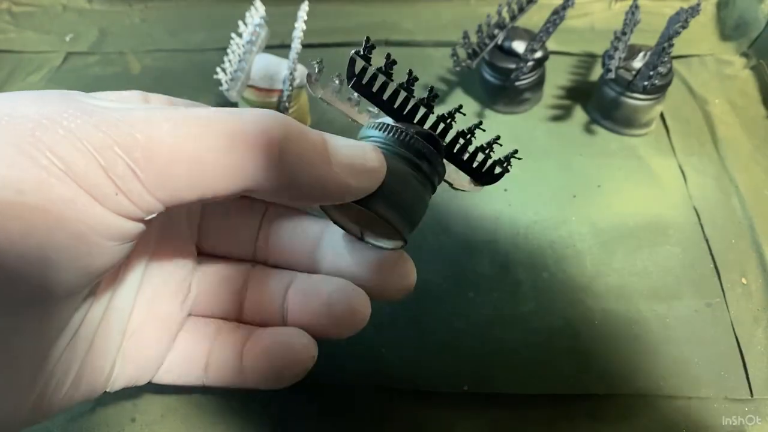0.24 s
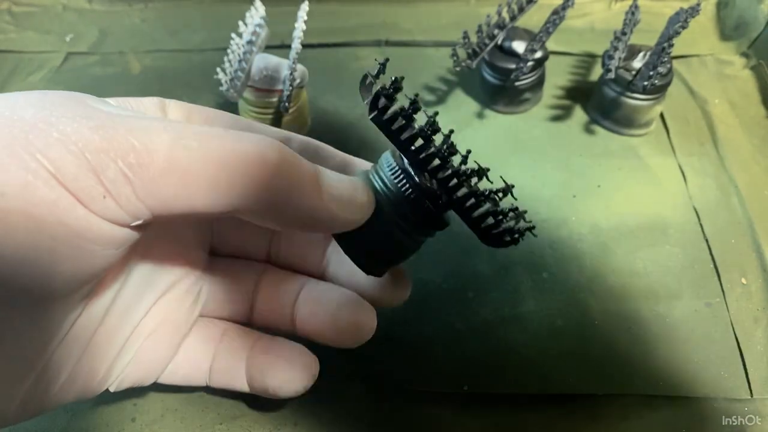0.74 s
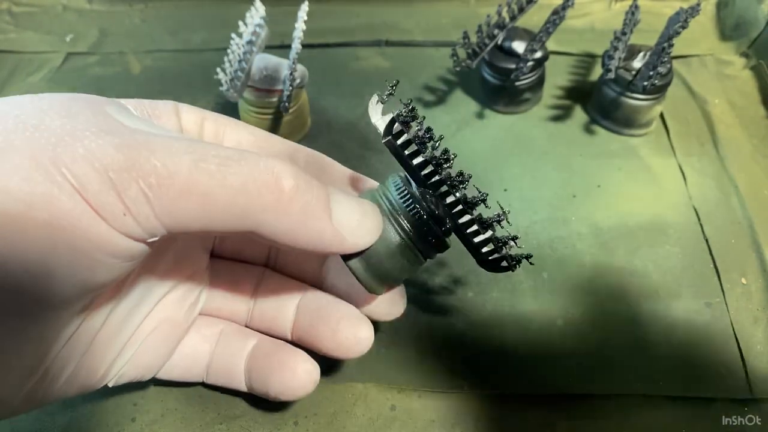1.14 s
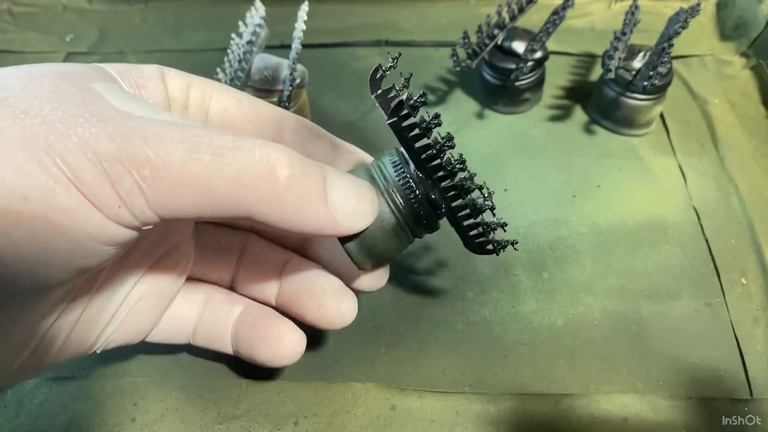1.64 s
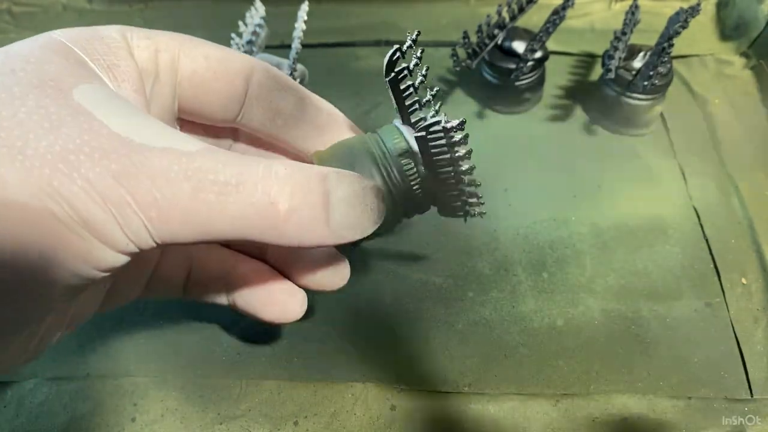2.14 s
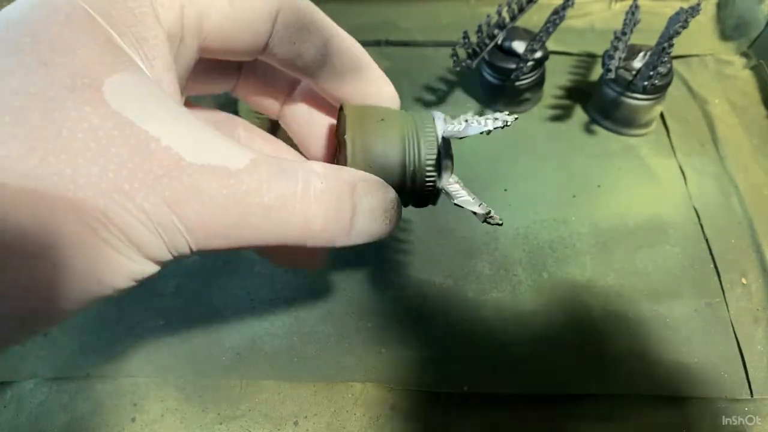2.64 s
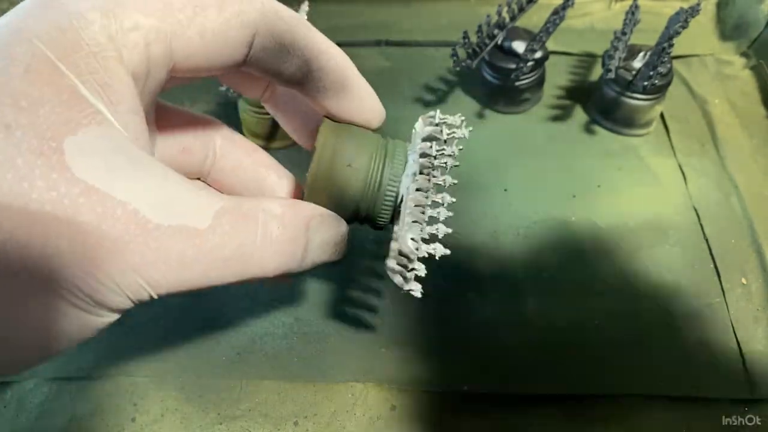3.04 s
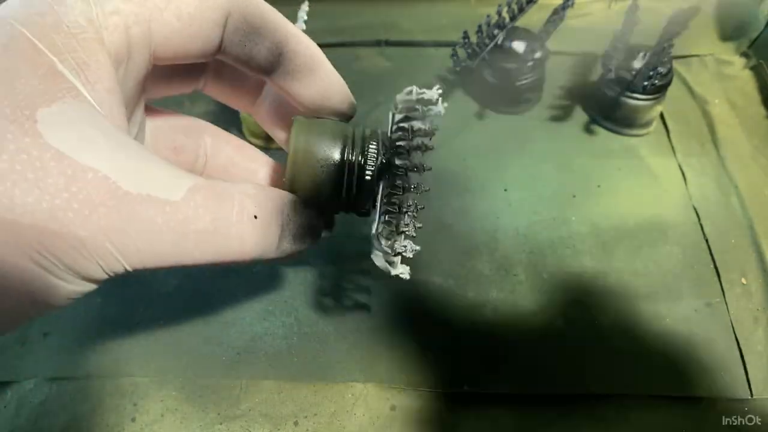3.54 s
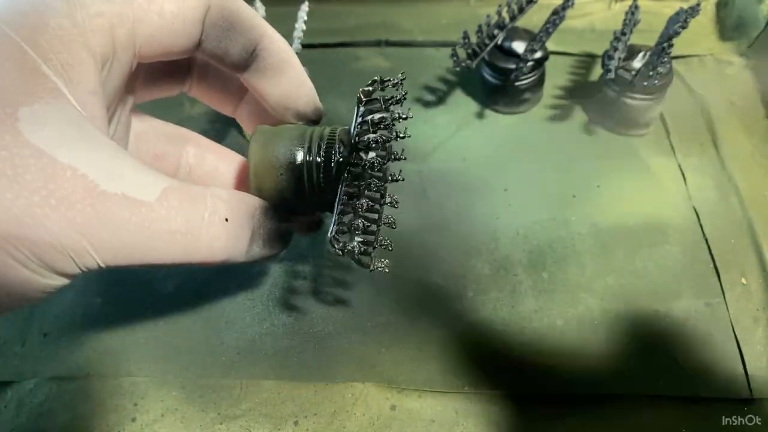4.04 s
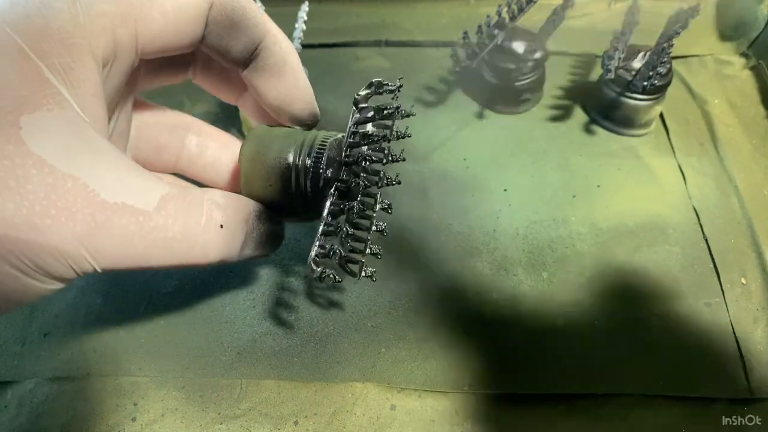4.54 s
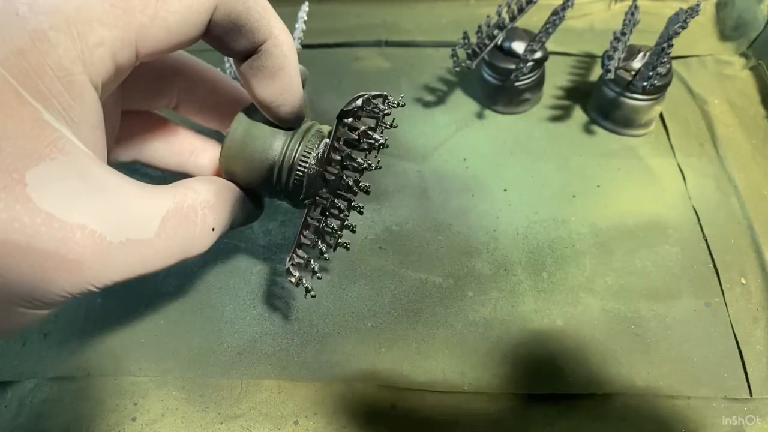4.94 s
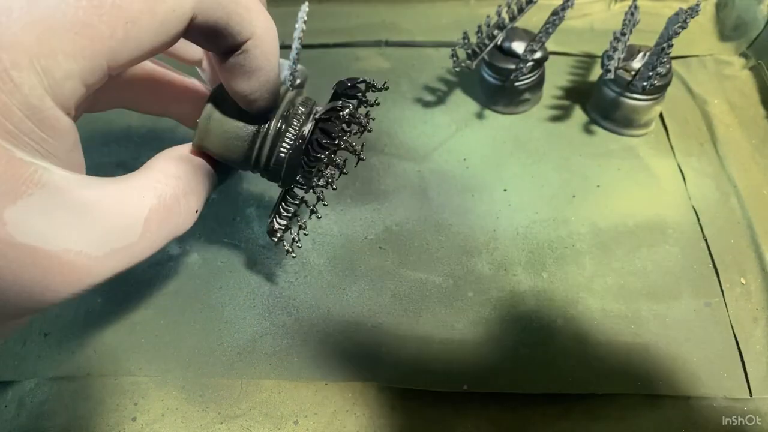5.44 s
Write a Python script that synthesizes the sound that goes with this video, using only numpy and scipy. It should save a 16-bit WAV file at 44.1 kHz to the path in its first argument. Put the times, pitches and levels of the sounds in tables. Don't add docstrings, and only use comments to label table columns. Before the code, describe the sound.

Close stereo phone pickup in a small quiet room. A spray paint can spits brief bright hisses while its mixing ball strikes the steel wall with hard metallic clacks and light bounces, paint sloshing inside. Around two seconds the ball rattles loosely, then after a short pause and another cluster of knocks near three seconds, puffs settle into an even run of about four per second, with a low room rumble beneath.

```python
import sys
import numpy as np
from scipy import signal
from scipy.fft import rfft, irfft, next_fast_len
from scipy.io import wavfile
from scipy.ndimage import uniform_filter1d, map_coordinates

SR = 44100
rng = np.random.default_rng(int(sys.argv[2]) if len(sys.argv) > 2 else 0)


def invert_db(level):
    return 10 ** (np.asarray(level, dtype=float) / 20)


def inscribe(sig):
    pcm = np.round(np.clip(np.atleast_2d(sig).T, -1, 1) * 32767)
    wavfile.write(sys.argv[1], SR, pcm.astype(np.int16))


N = 251537
FULL_DB = -24


def unit(x):
    return x / np.sqrt(np.mean(x ** 2) + 1e-20)


def along(points, hz):
    point_hz, value = np.transpose(points)
    return np.interp(np.log(hz + 1), np.log(point_hz + 1), value)


def curves(rows):
    s, *columns = np.transpose(rows)
    time_s = np.arange(N) / SR
    return np.array([np.interp(time_s, s, column, -200, -200) for column in columns])


def wobble(knots_per_s):
    knots = rng.standard_normal(int(N * knots_per_s / SR) + 4)
    return map_coordinates(knots, [np.arange(N) * knots_per_s / SR])


def filtered(x, response):
    m = next_fast_len(N + SR // 2)
    return irfft(rfft(x, m) * response(np.fft.rfftfreq(m, 1 / SR)), m)[..., :N]


def noise(spectrum, flutter=1):
    white = flutter * rng.standard_normal((2, N))
    return unit(filtered(white, lambda hz: invert_db(along(spectrum, hz))))


def resonances(modes):
    def response(f):
        total = 0
        for k, (hz, width_hz, db) in enumerate(modes):
            damping = 1j * f * width_hz
            total = total + (-1) ** k * invert_db(db) * damping / (hz * hz - f * f + damping)
        return total
    return response


def spray():
    # finger lands in s, valve fully open in s, finger lifts in s, strength in dB, sag while held in dB
    puffs = [(.001, .05, 0.11, -22.5, -3), (.252, 0.287, 0.38, -23.5, -6), (0.534, 0.591, 0.64, -22.5, -4),
             (.835, .885, .93, -30, -1.5), (1.099, 1.135, 1.177, -42, 7), (1.388, 1.418, 1.531, -23, -5.5),
             (2.095, 2.138, 2.2155, -21.5, -6), (2.485, 2.503, 2.575, -43, -7),
             (2.907, 2.946, 3.03, -36, -1.5), (3.195, 3.25, 3.303, -25.5, 1.4),
             (3.475, 3.512, 3.586, -21.5, -7.5), (3.741, 3.784, 3.862, -22.5, -7.5),
             (3.987, 4.037, 4.088, -24.5, -4), (4.233, 4.288, 4.336, -24.5, -4),
             (4.504, 4.547, 4.61, -24.5, -3), (4.733, 4.777, 4.826, -24.5, 1.2),
             (5.007, 5.053, 5.135, -21.5, -8.5), (5.257, 5.298, 5.372, -21.5, -5.5),
             (5.668, 5.686, 5.7, -38, -8)]
    # frequency in Hz, density in dB per Hz
    hiss_spectrum = [(3000, -120), (4500, -14), (6000, -13.5), (7200, -12), (8000, -9), (9500, -7),
                     (11300, -9.5), (12200, -9.5), (14200, -4.5), (15400, -8.5), (17000, -37)]
    # frequency in Hz, density in dB per Hz
    jet_spectrum = [(100, -120), (250, -32), (600, -2.5), (1200, -4), (2200, -1.5), (2700, -3), (4000, 1.5),
                    (5500, -7), (7000, -2), (10000, -36), (14000, -120)]
    # frequency in Hz, density in dB per Hz
    draught_spectrum = [(15, -120), (30, -19), (60, -6), (120, -11), (250, -11), (500, -14.5), (1000, -120)]
    jet_full_db, jet_follows = -34, 0.87
    draught_full_db, draught_follows, draught_lag_s = -42.5, 1.2, 0.013
    wall_hz, wall_width_hz, wall_db = 2586, 170, -4

    flow_db, thin_db = np.max([valve(*puff) for puff in puffs], axis=0)
    swing_db = flow_db - FULL_DB
    jet_db = jet_full_db + jet_follows * swing_db + thin_db + 1.5 * wobble(18)

    lag = max(round(draught_lag_s * SR), 1)
    draught = invert_db(draught_full_db + draught_follows * swing_db + 2 * thin_db)
    draught = np.maximum(draught, uniform_filter1d(draught, 2 * lag + 1, origin=lag))

    spit_db, surge_db = 2.2 * wobble(900), 0.7 * wobble(45)
    hiss = invert_db(flow_db + 5.5) * patches(noise(hiss_spectrum, invert_db(spit_db + surge_db)), patchy_db=3.0)
    jet = invert_db(jet_db + 4) * patches(noise(jet_spectrum, invert_db(0.8 * spit_db + surge_db)), patchy_db=1.5)
    jet = jet + filtered(jet, resonances([(wall_hz, wall_width_hz, wall_db)]))
    return hiss + jet + invert_db(3.0) * draught * noise(draught_spectrum, invert_db(2.7 * wobble(30)))


def valve(press_s, full_s, lift_s, db, sag_db):
    crack_s = 0.0025
    opening_s, opening_db = 0.019, 11.5
    snap_s, snap_db, thin_db = 0.0036, 5, 5.5
    closing_s, closing_db, sealing_s = 0.027, 28, 0.0083
    half_sag = 0.38

    leak_db = -44 + 0.3 * (db - FULL_DB)
    rush_s = max(full_s - opening_s, press_s + 2 * crack_s)
    shut_s = lift_s + closing_s
    ajar_db = max(db - opening_db, leak_db)
    end_db = db + sag_db - closing_db
    return curves([(press_s - crack_s, leak_db - 25, -thin_db),
                   (press_s + crack_s, leak_db, -thin_db),
                   (rush_s, ajar_db, -thin_db),
                   (rush_s + snap_s, min(ajar_db + snap_db, db), 0),
                   (full_s, db, 0),
                   ((full_s + lift_s) / 2, db + half_sag * sag_db, 0),
                   (lift_s, db + sag_db, 0),
                   (shut_s, end_db, 0),
                   (shut_s + sealing_s, end_db - 25, 0)])


def patches(x, patchy_db):
    z = signal.stft(x, nperseg=256)[2]
    field = uniform_filter1d(rng.standard_normal(z.shape[1:]), 3, 0)
    field = uniform_filter1d(field, 30, 1)
    return unit(signal.istft(z * invert_db(patchy_db * unit(field)), nperseg=256)[1][:, :N])


def ball():
    # time in s, peak in dB, dull part in dB, clank part in dB, wall note in Hz
    blows = [(.0261, -4.5, -19.5, 1, 2290), (.1441, -13, -11.5, 4, 2460), (.242, -15, -13.5, -1.5, 2430),
             (.3151, -13.5, -43, -19.5, 2120), (.5666, -5.5, -30, -3.5, 2376),
             (.692, -10.5, -14.5, 1.5, 2440), (.8462, -19, -3, -4, 2660), (.9198, -24.5, -8.5, -1.5, 2030),
             (1.1758, -6.5, -21.5, 3, 2420), (1.2677, -12.5, -13.5, -1.1, 1840),
             (1.3661, -18.5, -12, -4.5, 1890), (1.4452, -16.5, -19.5, -18, 2190),
             (1.6875, -14, -14, 8.5, 2080), (1.9719, -22.5, -13, 2.5, 2540), (2.8382, -15.5, -17, -3, 2530),
             (2.8958, -19.5, -18.5, 1.5, 2360), (2.9457, -21.5, -33.5, 1, 2370),
             (3.0045, -26, -33.5, 5.5, 2300), (3.194, -27.5, -12, 4.5, 2280),
             (3.7404, -30.5, -15, 2.5, 2310), (4.7182, -34.5, -20.5, -0.9, 2386),
             (5.247, -32.5, -18.5, 4, 2490)]
    # time in s, peak in dB, clank part in dB, wall note in Hz
    bounces = [(.49, -51, -15, 2250), (.512, -45, -12, 2106), (0.521, -51, -8, 2102),
               (0.9563, -27.5, -14, 2250), (.981, -33, -18, 2260), (.9993, -34.5, -18, 2300),
               (1.8045, -27, 6, 2820), (1.8183, -22.5, 4, 2080), (1.8242, -25.5, 7, 2420),
               (1.8599, -28.5, 3.5, 2000), (1.9038, -25.5, -1.5, 2350), (1.939, -40, 10, 2220),
               (2.0023, -29, -15, 2410), (2.0184, -38.5, 10, 2730), (2.0228, -27.5, -4, 2150),
               (2.0453, -32, -4, 2200), (2.0635, -40, -7, 2300), (2.079, -41, -3.5, 2500),
               (2.6265, -46.5, -18, 2700), (2.878, -28.5, 0, 2430), (2.9189, -30, 3, 2450),
               (2.938, -33.5, 2, 2600), (3.0191, -29, 4, 2430), (3.1337, -47, -5, 2970),
               (3.409, -47, -17, 2860), (4.385, -46.5, 4, 2501), (4.4445, -48, -18, 2940),
               (4.9453, -51.5, -19, 2761), (5.4337, -51.5, 11, 2910), (5.561, -54, 5, 2300)]
    # frequency in Hz, width in Hz, level in dB
    dull = [(410, 470, -1), (880, 510, 11), (1300, 1100, 9.5)]
    # frequency in Hz, width in Hz, level in dB
    wall = [(1900, 290, 1), (2610, 1800, 1.9)]
    # frequency in Hz, width in Hz, level in dB
    clank = [(3910, 380, 4.5), (4900, 720, 7.5), (7450, 200, -6)]
    # frequency in Hz, width in Hz, level in dB
    tick = [(9600, 840, 20.5), (11100, 900, -33), (14000, 2500, -17)]
    bounce_dull_db = -16.5
    tick_base_db, tick_follows = -14.5, 0.4
    tick_grows, firm_db = 0.17, -15.5
    t60_s, gains_db = [0.025, 0.036, 0.025, 0.018], [26.5, 17.0, 14.46, 13]

    t = np.arange(SR // 40) / SR
    contacts = [*blows, *((s, db, bounce_dull_db, clank_db, hz) for s, db, clank_db, hz in bounces)]
    chatter = 0.1 * rng.standard_normal((len(contacts), 4, 2, len(t)))
    chatter[..., 30] = 1
    drive, notes = np.zeros((4, 2, N + SR)), np.zeros((2, N + SR))
    for (s, db, dull_db, clank_db, note_hz), shake in zip(contacts, chatter):
        start = round(s * SR)
        tick_db = tick_base_db + tick_follows * clank_db + tick_grows * (db - firm_db)
        for k, part_db in enumerate([dull_db, 0, clank_db, tick_db]):
            drive[k, :, start:start + len(t)] += invert_db(db + part_db + gains_db[k] - 60 * t / t60_s[k]) * shake[k]
        note = invert_db(db - 10 - 60 * t / 0.012) * np.sin(2 * np.pi * note_hz * t)
        rung = signal.fftconvolve(shake[1] * invert_db(-60 * t / 0.025), note[None], axes=1)
        notes[:, start:start + rung.shape[1]] += rung
    rings = [filtered(d[:, :N], resonances(modes)) for d, modes in zip(drive, [dull, wall, clank, tick])]
    return notes[:, :N] + sum(rings)


def room(x):
    # frequency in Hz, t60 in s
    decay = [(200, 0.15), (1000, 0.067), (2400, 0.18), (6000, .16), (14000, 0.15)]
    out, step = np.zeros((2, N + SR)), SR // 4
    for start in range(0, N, step):
        hz, t, z = signal.stft(rng.standard_normal((2, SR // 3)), SR, nperseg=256)
        fade = invert_db(-60 * t / along(decay, hz)[:, None])
        tail = signal.istft(z * fade, SR, nperseg=256)[1]
        answer = signal.fftconvolve(x[:, start:start + step], tail / np.linalg.norm(tail[0]), axes=1)
        out[:, start + 200:][:, :answer.shape[1]] += answer
    return out[:, :N]


def background():
    # time in s, level in dB
    stirring = [(0, -70.5), (.45, -61), (.75, -71.5), (.94, -58), (1.15, -64.5), (1.5, -68), (1.75, -62.5),
                (2.08, -53), (2.22, -70), (2.77, -81.5), (2.86, -61), (3.04, -57.5), (3.1, -69), (4, -72.5),
                (4.9, -72.5), (5.55, -87.5), (5.57, -72.5), (5.71, -63)]
    # time in s, level in dB
    surging = [(0, -55), (.45, -72), (.9, -56), (1.35, -58.5), (1.55, -69), (2, -59), (2.3, -72.5),
               (2.95, -70), (4, -67), (5.5, -79.5), (5.6, -65.5), (5.71, -59)]
    # frequency in Hz, density in dB per Hz
    slosh_spectrum = [(400, -120), (800, -4.5), (1500, 2), (2300, 2.5), (3200, -2.5), (5000, -4.5),
                      (7000, -8.5), (10000, -8.5), (14000, -15), (16500, -34.5)]
    # frequency in Hz, density in dB per Hz
    murmur_spectrum = [(120, -120), (200, -16.5), (300, -4.5), (390, -0.5), (480, -9.5), (700, -12.5),
                       (1400, -21), (2500, -120)]
    # frequency in Hz, density in dB per Hz
    rumble_spectrum = [(15, -120), (25, -15.5), (45, -6.5), (62, 0.5), (95, -4), (130, -9.5), (250, -19),
                       (600, -30.5), (1500, -52), (4000, -120)]
    # time in s, peak in dB, frequency in Hz, t60 in s
    thuds = [
        (5.564, -42.5, 400, 0.048),
    ]
    usual_db = -65.5
    rumble_db, rumble_follows = -63.5, 0.3
    roll_hz, roll_width_hz, roll_db, roll_follows, roll_bumpy_db = 2250, 500, -68, 1.5, 5

    stirred_db = curves(stirring)[0] - usual_db
    slosh = noise(slosh_spectrum, invert_db(1.5 * wobble(25) + 2 * wobble(400)))
    sound = invert_db(usual_db + stirred_db + 2) * patches(slosh, patchy_db=1.8)
    sound += invert_db(curves(surging)[0]) * noise(murmur_spectrum, invert_db(1.6 * wobble(14)))
    sound += invert_db(rumble_db + rumble_follows * stirred_db) * noise(rumble_spectrum, invert_db(2.5 * wobble(5)))[0]
    bumps = invert_db(roll_bumpy_db * wobble(120)) * rng.standard_normal((2, N))
    roll = unit(filtered(bumps, resonances([(roll_hz, roll_width_hz, 0)])))
    sound += invert_db(roll_db + roll_follows * stirred_db) * roll
    for s, db, hz, t60_s in thuds:
        t = np.maximum(np.arange(N) / SR - s, 0)
        sound += invert_db(db - 60 * t / t60_s) * np.sin(2 * np.pi * hz * t)
    return sound


def scene():
    jet, knocks = spray(), ball()
    lingering_modes = [(1100, 1500, -3), (2300, 2000, -2.0), (5000, 1500, -5.0), (11400, 8000, -7)]
    lingering = filtered(knocks, resonances(lingering_modes))
    return jet + knocks + room(invert_db(-18.0) * jet + invert_db(-6.0) * lingering) + background()


def low_pass(x):
    return signal.sosfilt(signal.butter(12, 15820, fs=SR, output="sos"), x)


def record(dry):
    # frequency in Hz, lead in radians
    lead = [(0, 0), (860, -3.9), (1120, -3.7), (1640, -5.0), (2500, -6.0), (3880, -7.6), (4310, -6.4),
            (5680, -6.9), (7580, -4.7), (8350, -3.2), (9560, -3.1), (10600, -1.4), (12700, 0.3),
            (14800, 2.9), (15900, 3.3)]
    # frequency in Hz, left minus right in dB
    shade = [(60, -2), (200, -5), (770, -10), (1200, -8), (1800, -7), (2500, -3), (3300, -7), (4200, -12),
             (5000, -6), (6400, -2), (7200, 0), (16000, 0)]
    # frequency in Hz, shared part from 0 to 1
    alike = [(60, .86), (250, .68), (700, .5), (2500, .8), (4100, .35), (5200, .68), (7600, .82),
             (8400, .997), (9500, .997), (10500, .82), (12300, .98), (13800, .93), (14900, .98)]
    sway_s, sways_per_s, top_hz = 2e-6, 8, 15750

    def left_response(hz):
        share = np.clip(along(alike, hz), 0, 1)
        turn = invert_db(along(shade, hz)) * np.exp(1j * np.interp(hz, *np.transpose(lead)))
        return turn * np.array([share, np.sqrt(1 - share ** 2)])

    left = filtered(dry, left_response).sum(axis=0)
    left = left + sway_s * wobble(sways_per_s) * np.gradient(left) * SR
    pair = np.array([left, dry[0]])
    pair = pair / (1 + np.abs(pair / 0.95) ** 4) ** 0.25
    mix = filtered(pair, lambda hz: 1 / (1 + np.exp((hz - top_hz) / 40)))
    return low_pass(mix)


dry = scene()
out = record(dry)
inscribe(out)
```